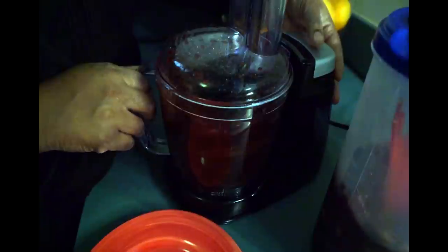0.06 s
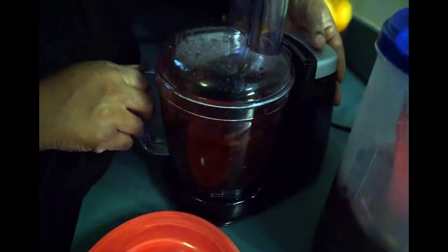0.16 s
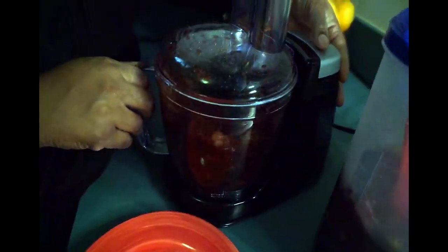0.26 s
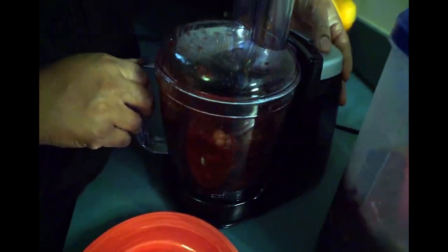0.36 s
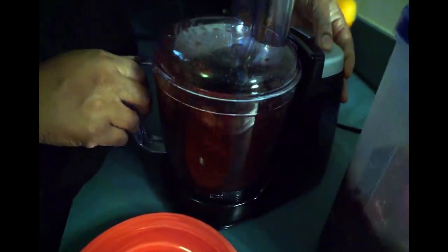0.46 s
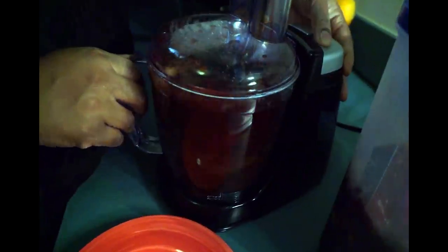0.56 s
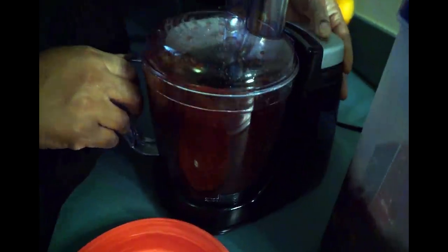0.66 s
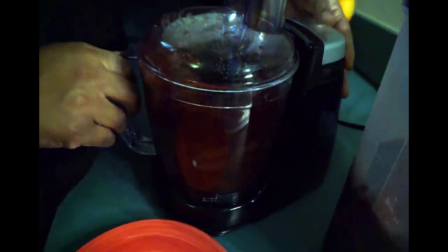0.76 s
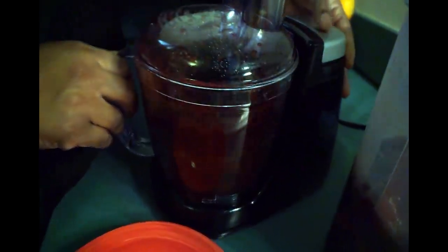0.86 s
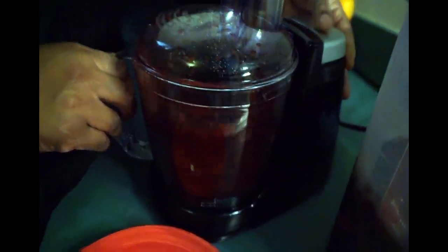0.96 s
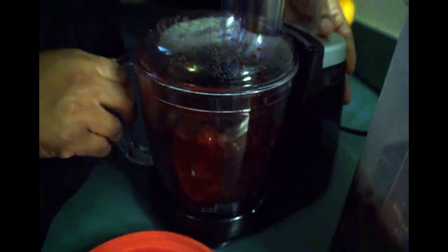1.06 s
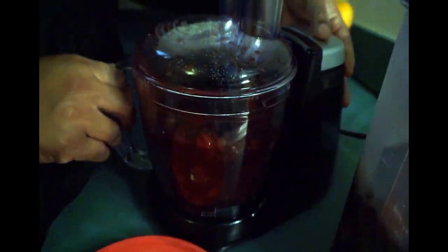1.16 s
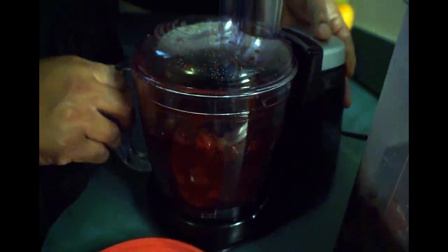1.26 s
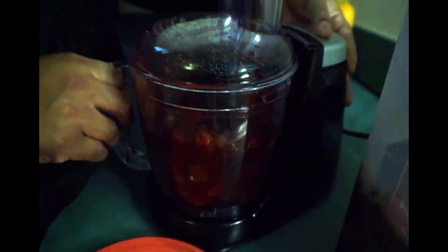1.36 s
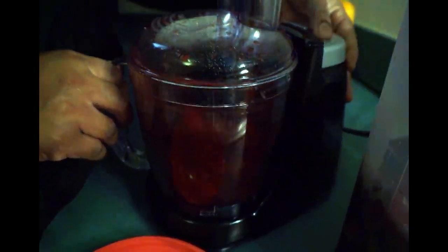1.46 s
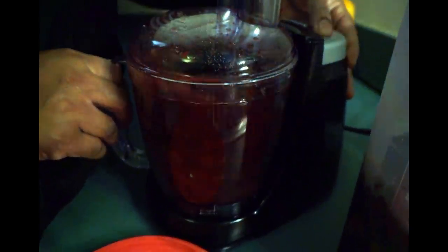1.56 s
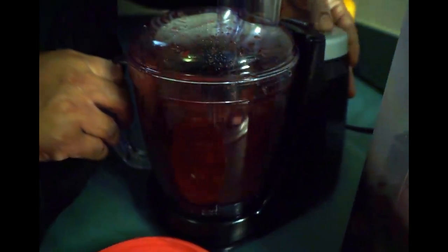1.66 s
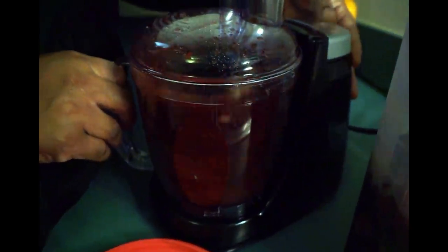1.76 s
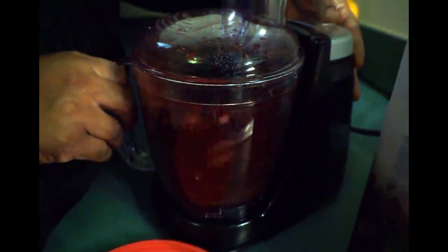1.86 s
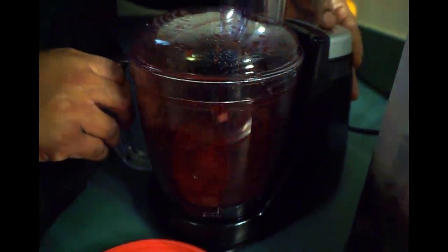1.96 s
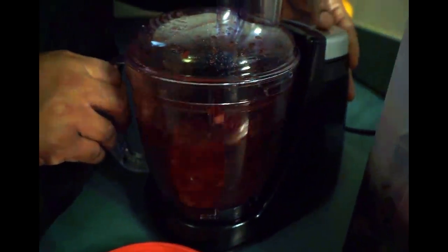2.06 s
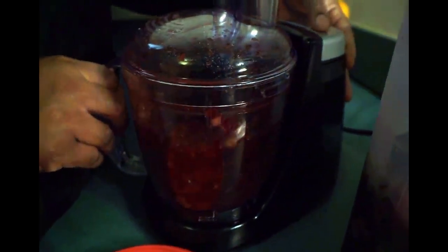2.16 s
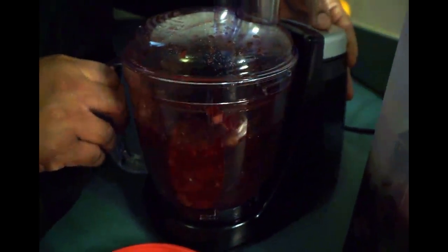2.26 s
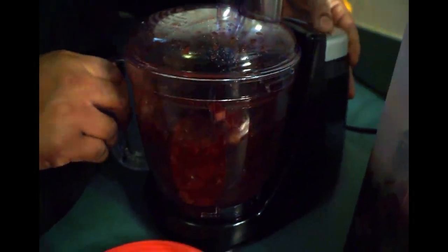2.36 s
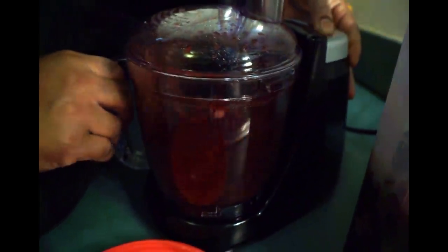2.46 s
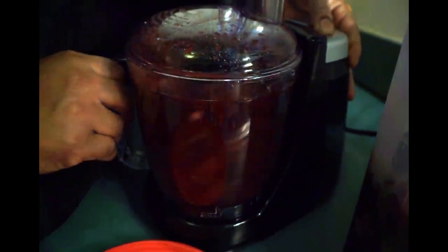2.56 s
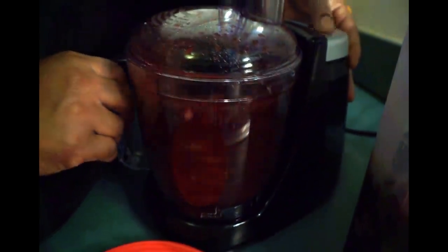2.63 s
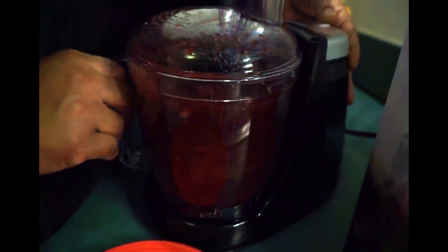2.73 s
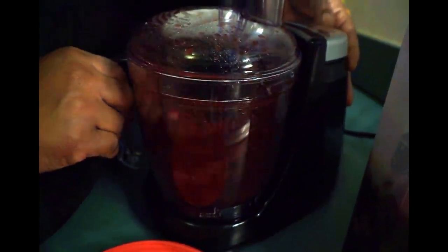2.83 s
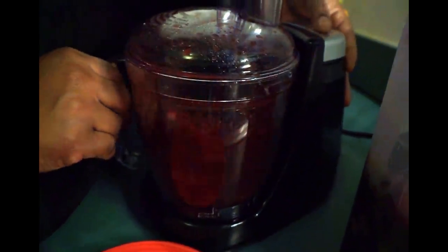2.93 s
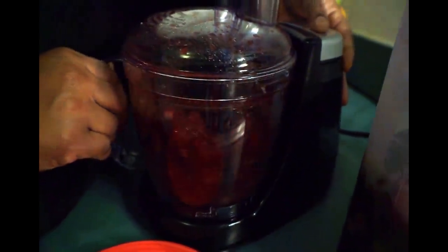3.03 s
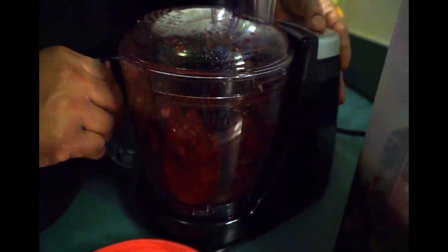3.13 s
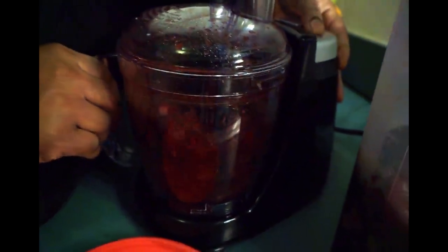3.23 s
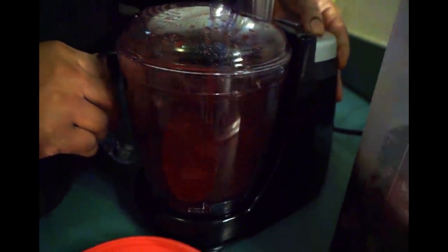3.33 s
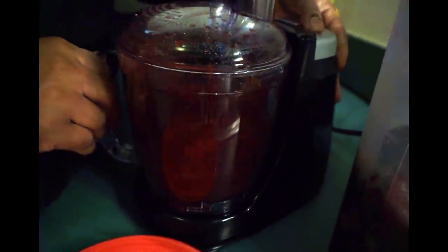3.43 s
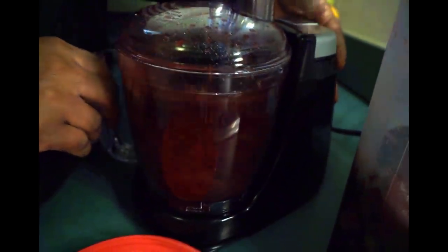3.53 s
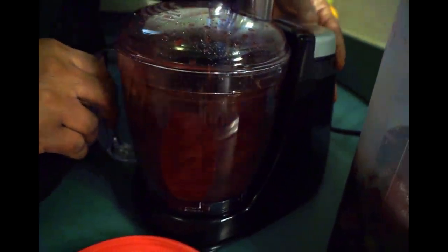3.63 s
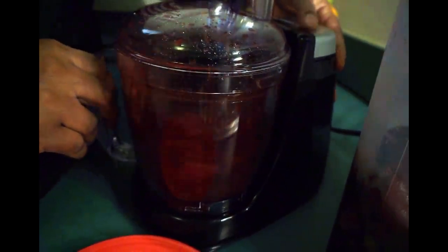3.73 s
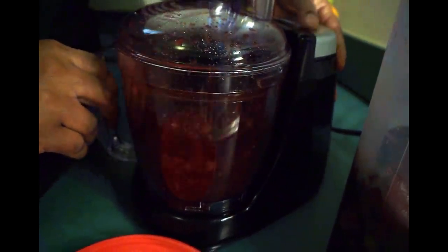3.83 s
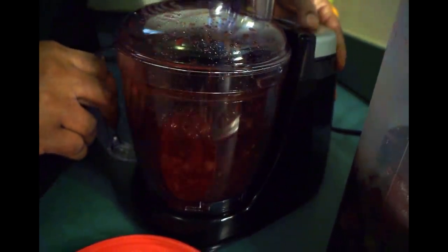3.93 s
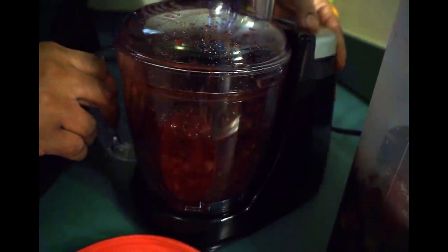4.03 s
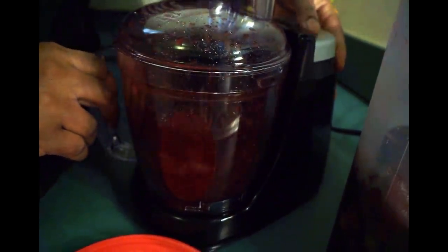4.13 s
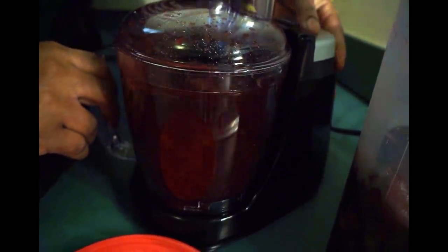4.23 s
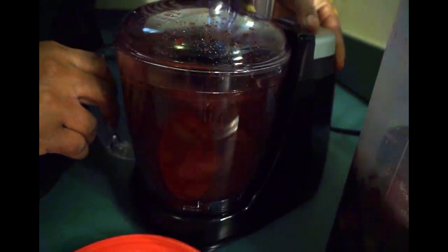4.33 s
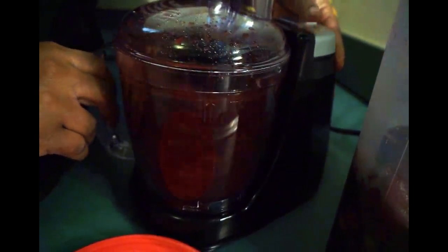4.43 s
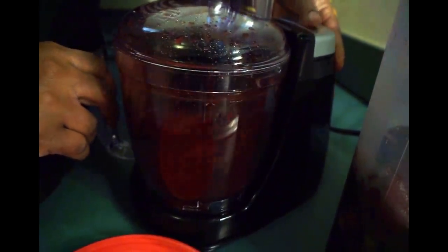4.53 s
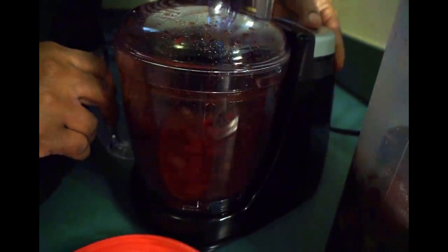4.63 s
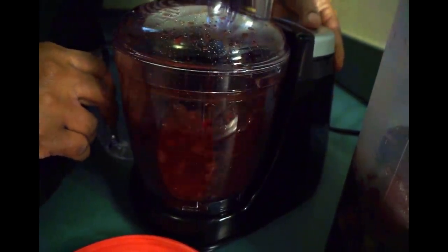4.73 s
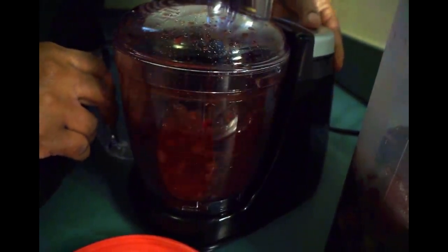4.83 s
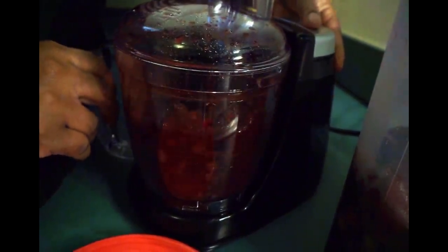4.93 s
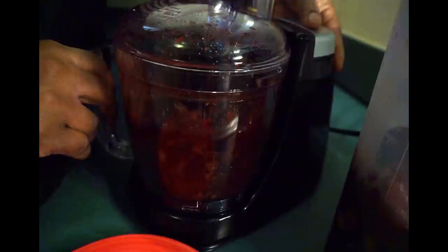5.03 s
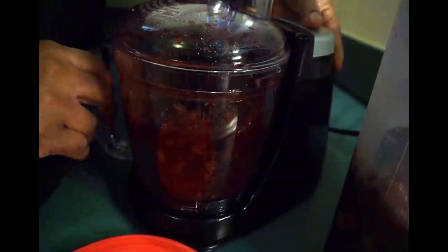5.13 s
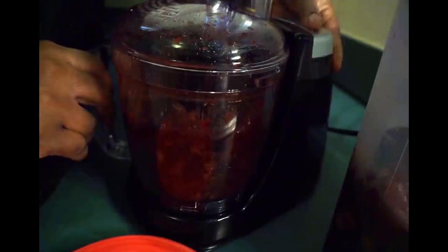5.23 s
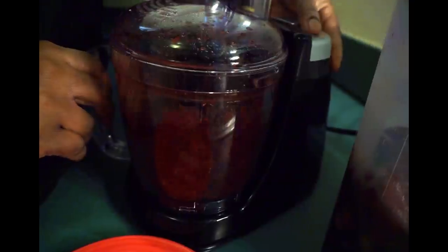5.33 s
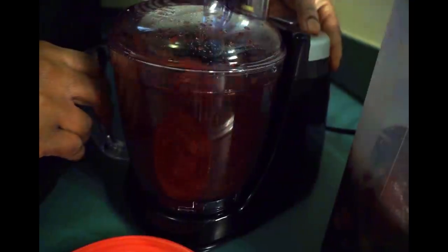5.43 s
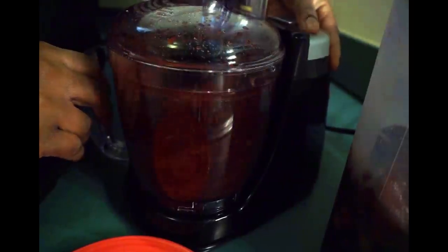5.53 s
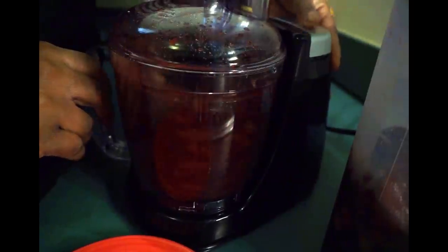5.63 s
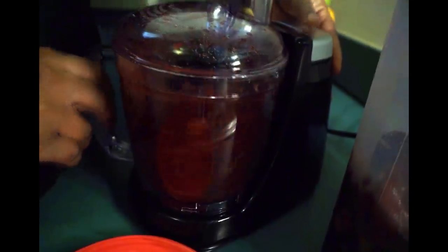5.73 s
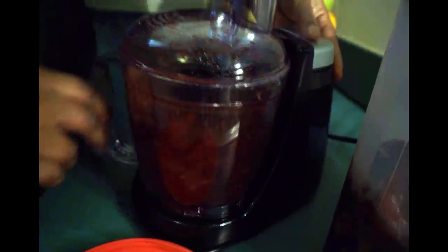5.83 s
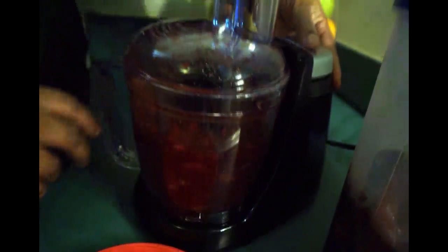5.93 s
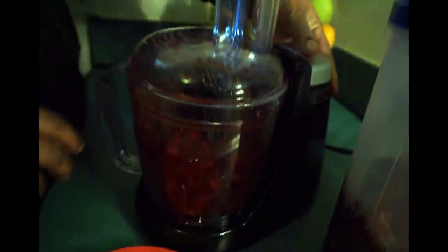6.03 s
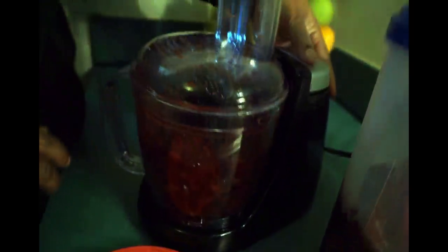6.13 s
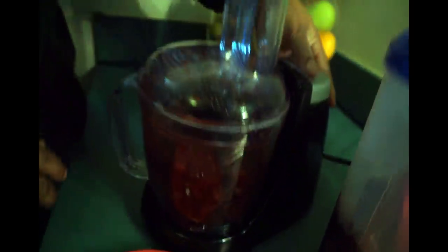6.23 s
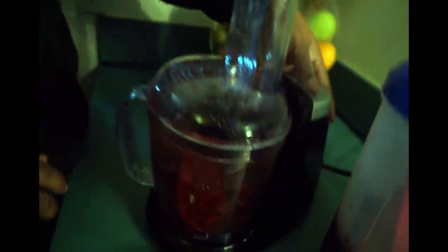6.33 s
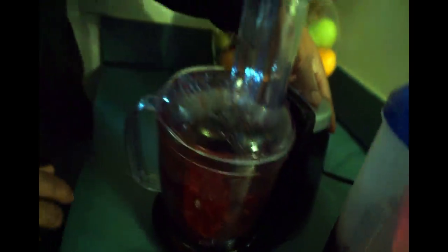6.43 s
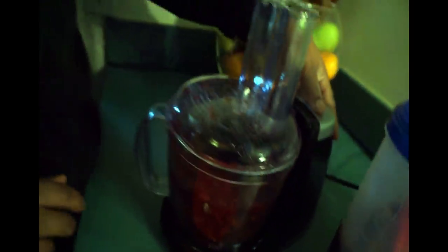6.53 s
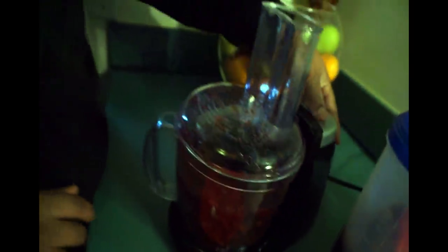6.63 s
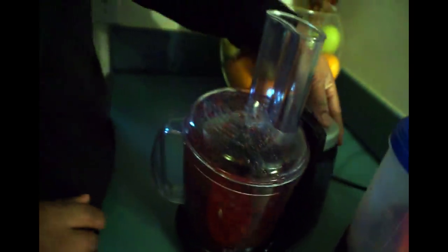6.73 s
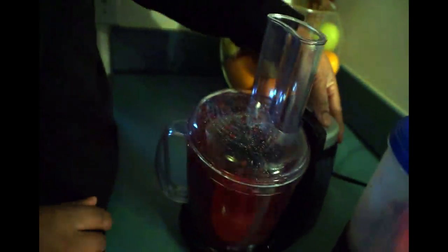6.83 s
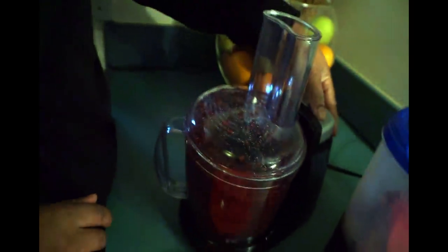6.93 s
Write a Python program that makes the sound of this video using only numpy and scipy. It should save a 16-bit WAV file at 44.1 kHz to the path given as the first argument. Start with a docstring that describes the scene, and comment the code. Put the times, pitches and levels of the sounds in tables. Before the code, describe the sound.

A small food processor chops fruit in short pulses, heard close up in a home kitchen. At the very start the motor is already winding down. New pulses come at about 0.5, 1.6, 2.5, 3.4, 4.2 and 5.4 seconds, each powered for roughly a quarter second, the last of these slightly longer. Each opens with a jolt of the housing, followed by rattling gears and a quickly rising whine that sinks as the blade coasts. Wet pulp churns, juice hisses and firm pieces knock against the plastic bowl. Between pulses the switch and lid creak and click, and froth fizzes faintly over a low household hum. The pulp gives a brief bubbling gloop near 5 seconds. After a lull with two soft clicks around 6.5 seconds, a final pulse starts at 6.8 seconds. The loudest peaks slightly overload the microphone.

```python
"""On a kitchen counter, a small food processor chops fruit in eight short pulses.
Each press jolts the housing. The gears rattle and whine at their tooth rate, which climbs under power
and sinks as the motor coasts, while the blade throws pulp and juice against the resonant plastic bowl.
Between pulses the switch creaks, froth fizzes and the pulp gloops over a low household hum.
The loudest moments overload the microphone."""
import sys
import numpy as np
from scipy import signal
from scipy.fft import rfft, irfft
from scipy.io import wavfile
from scipy.ndimage import uniform_filter1d, minimum_filter1d

SR = 44100
rng = np.random.default_rng(int(sys.argv[2]) if len(sys.argv) > 2 else 0)


def dump_mix(stems):
    """Bounce the given channels to the path in sys.argv[1] as a 16-bit WAV at rate SR."""
    frames = np.atleast_2d(stems).T  # one column per channel
    limited = np.clip(frames, -1, 1)  # hard clip at full scale
    pcm = np.round(limited * 32767).astype(np.int16)
    wavfile.write(sys.argv[1], SR, pcm)


N = 308259
TIME = np.arange(N) / SR
FREE_TOOTH_HZ, TEETH_PER_SWEEP = 4574, 36   # tooth rate at full speed; teeth per sweep of a blade
CRITICAL_HZ, CRITICAL_WIDTH_HZ = 3230, 210   # tooth rate at which the whole machine shakes

# presses of the switch: on_s, off_s, spin_up_s, coast_s, jolt_db, pulp_db, rattle_db, spray_db,
# driven_whine_db, coasting_whine_db, hoot_db, froth_db
PRESSES = [(-.28, -0.056, .1, .224, -10, -7.5, -18, -27, -23, -21, -40, -64),
           (.515, .736, 0.1, .234, -8, -8, -14.5, -30, -22, -24, -26.5, -63),
           (1.558, 1.786, .098, .24, -11, -7.5, -14.5, -29, -20.5, -23.5, -31.5, -61.5),
           (2.516, 2.734, 0.1, 0.24, -8, -6.5, -15, -24.5, -19.5, -21, -29, -60),
           (3.358, 3.571, .104, 0.23, -10.5, -7.5, -14.5, -28, -22, -23.5, -23.5, -64.5),
           (4.242, 4.441, .1, .238, -14, -8, -16, -29, -22.5, -23, -27, -54.5),
           (5.415, 5.698, 0.11, 0.25, -9.5, -8, -16, -27.5, -20.5, -23, -25, -47),
           (6.817, 7.049, 0.1, 0.27, -14.5, -7.5, -17.5, -36, -23, -23, -44, -57)]
# modes of the motor housing: pitch_hz, bandwidth_hz, gain_db
HOUSING_MODES = [(557, 50, -8.5), (807, 90, -4), (1107, 140, -2), (1262, 80, -1), (1520, 200, -3),
                 (2262, 510, -6), (3013, 250, 2.5), (3125, 110, -1), (3242, 130, 1), (4000, 400, -4),
                 (5050, 480, 1.5), (5770, 520, 5.5)]
# spectrum of the gear rattle: frequency_hz, density_db
RATTLE_SPECTRUM = [(30, -33), (90, -20.5), (200, 0), (950, 3), (1300, 4.5), (2000, 1), (2500, -0.5),
                   (3200, -0.5), (3800, -1.5), (4500, -10), (6000, -15.5), (9000, -19), (15500, -33.5)]
# spectrum of the wet spray: frequency_hz, density_db
SPRAY_SPECTRUM = [(100, -25), (2500, -7.5), (4400, 1), (5100, 5.5), (6000, 1.5), (7000, -2.5), (8500, -9.5),
                  (9800, -6), (12000, -13.5), (15000, -11)]


def from_db(db):
    """Decibels to amplitude ratio."""
    return 10 ** (np.asarray(db) / 20)


def unit_rms(x):
    """Normalisation to unit mean power."""
    return x / np.sqrt(np.mean(x ** 2) + 1e-20)


def evened(x, size=1800):
    """Division by the envelope holds the short-term rms at one."""
    local_power = np.abs(uniform_filter1d(x ** 2, size))
    return x / np.sqrt(local_power + 1e-6 * np.mean(x ** 2))


def near(hz, centre_hz, width_hz):
    """Gaussian bell of height one."""
    return np.exp(-.5 * ((hz - centre_hz) / width_hz) ** 2)


def dying(t60, age):
    """Exponential damping: 60 dB lost in t60 seconds."""
    return np.exp(-np.log(1000) * age / t60)


def drift(rate_hz):
    """Low-passed noise: a smooth random fluctuation of unit rms."""
    r = np.exp(-2 * np.pi * rate_hz / SR)
    return unit_rms(signal.lfilter([1], [1, -2 * r, r * r], rng.standard_normal(N + SR))[SR:])


def bandpass(x, low_hz, high_hz, order):
    """Maximally flat band-pass filter."""
    return signal.sosfilt(signal.butter(order, [low_hz, high_hz], "band", fs=SR, output="sos"), x)


def coloured(x, spectrum, size=4096):
    """Minimum-phase filter of unit energy with the given spectrum."""
    known_hz, known_db = np.transpose(spectrum)
    hz = np.maximum(np.arange(size // 2 + 1) * SR / size, 1)
    gain = from_db(np.interp(np.log(hz), np.log(known_hz), known_db))
    cepstrum = irfft(np.log(gain))
    response = irfft(np.exp(rfft(2 * cepstrum[:size // 2], size)))
    return signal.fftconvolve(x, response / np.linalg.norm(response))[:N]


def resonate(x, modes):
    """Modal superposition: damped resonators driven in parallel."""
    out = np.zeros(N)
    for hz, width_hz, db in modes:
        r = np.exp(-np.pi * width_hz / SR)
        feedback = [1, -2 * r * np.cos(2 * np.pi * hz / SR), r * r]
        out += from_db(db) * signal.lfilter([1 - r, 0, r - 1], feedback, x + 1e-18)
    return out


def add(out, start_s, sound):
    """Superpose a sound that starts within the scene."""
    start = round(start_s * SR)
    if 0 <= start < N:
        out[start:start + len(sound)] += sound[:N - start]


def bursts(starts_s, levels_db, t60):
    """Transient excitation: a damped burst of noise at each start."""
    envelope, age = np.zeros(N), TIME[:SR // 4]
    for start_s, db in zip(starts_s, levels_db):
        add(envelope, start_s, from_db(db) * dying(t60, age))
    return envelope * rng.standard_normal(N)


def impacts(hits, spread_db):
    """Shot noise: an impulse of random size and sign at each hit."""
    return hits * from_db(spread_db * np.minimum(rng.exponential(1, N), 4)) * rng.choice([-1, 1], N)


def room_tone():
    """Ambient noise: a low household rush and mains hum with wandering phase."""
    # partials of the hum: pitch_hz, rms_db
    hum_partials = [(118.4, -61.5), (236.9, -59), (312, -60)]
    # background of the kitchen: frequency_hz, density_db
    room_spectrum = [(25, -41), (45, -29.5), (80, -22.5), (110, -10.5), (160, -13), (230, -6.5),
                     (370, -2.5), (600, -8), (780, -11), (1000, -16.5), (1250, -16), (2000, -28.5),
                     (4500, -36), (8000, -47.5), (15000, -54)]
    hum = sum(from_db(db) * unit_rms(np.sin(2 * np.pi * hz * TIME + .78 * drift(1.7)))
              for hz, db in hum_partials)
    return hum + coloured(rng.standard_normal(N), room_spectrum) * from_db(-49.5 + 1.7 * drift(7.2))


def kitchen(x, t60=.31, wet_db=-9):
    """Reverberation: close walls and cupboards add a dense tail, duller than the direct sound."""
    age = TIME[:SR // 2]
    tail = rng.standard_normal(len(age)) * dying(t60, age) * (age > .003)
    tail = bandpass(tail / np.linalg.norm(tail), 400, 8000, order=1)
    return x + from_db(wet_db) * signal.fftconvolve(x, tail)[:N]


def bowl(x, low_hz=150, high_hz=1250):
    """Modal radiation: the small, pulp-damped bowl gives off neither bass nor treble."""
    # modes of the plastic bowl: pitch_hz, bandwidth_hz, gain_db
    bowl_modes = [(139, 49, -9), (226.8, 49, -9.5), (303.4, 15, 3), (364.3, 57, 0), (514, 44, 4.5),
                  (576.5, 54, 2), (645, 22, 11.5), (723.7, 77, 6.5), (758, 14, 1.5), (1128, 55, -2)]
    return bandpass(resonate(x, bowl_modes), low_hz, high_hz, order=2)


def froth(since_s):
    """Shot noise of popping bubbles: froth whipped up by each pulse fizzes as it settles."""
    # fizz of the froth: frequency_hz, density_db
    froth_spectrum = [(800, -7.5), (3000, -5), (4800, -1.5), (6500, -4), (10000, -9), (12500, -14.5),
                      (15500, -24)]
    pops = impacts(rng.random(N) < 1200 / SR, spread_db=1)
    fizz = unit_rms(coloured(pops, froth_spectrum)) * from_db(2 * drift(10))
    return fizz * dying(t60=2.1, age=since_s)


def gloops():
    """Bubble resonance: air rings in the pulp and rises a little in pitch as it nears the surface."""
    # rising bubbles: start_s, pitch_hz, level_db, t60_s
    bubbles = [(4.922, 432, -32, 0.19), (4.924, 620, -40.5, 0.06), (4.954, 540, -33, 0.058),
               (4.991, 744, -29, 0.068), (5.012, 806, -39, 0.15)]
    out, age = np.zeros(N), TIME[:SR // 4]
    for start_s, hz, db, t60 in bubbles:
        phase = 2 * np.pi * hz * age * (1 + .32 * age)
        add(out, start_s, from_db(db) * dying(t60, age) * np.sin(phase))
    return out


def ticks():
    """Contact noise of plastic parts: a dull creak of the body, a rattling edge and a sharp snap."""
    # contacts of switch, lid and handle: start_s, creak_db, edge_db, snap_db
    contacts = [(0.47, -31.5, -46, -57), (1.082, -28, -51, -47), (1.533, -29.5, -42.5, -54),
                (2.34, -40, -70, -71.5), (2.461, -30, -44.5, -58), (2.482, -31.5, -49, -65),
                (3.14, -42, -49.5, -54.5), (3.154, -50, -47, -49), (3.304, -26.5, -46, -64),
                (3.325, -33, -44.5, -56), (4.236, -17, -47, -51), (5.379, -32, -49, -63.5),
                (5.387, -30, -47, -63.5), (6.418, -39.5, -63, -71), (6.589, -34.5, -52, -66.5)]
    start_s, creak_db, edge_db, snap_db = np.transpose(contacts)
    creak = bowl(bursts(start_s, creak_db, t60=.13))
    edge = coloured(bursts(start_s, edge_db, t60=.08), RATTLE_SPECTRUM)
    snap = coloured(bursts(start_s, snap_db, t60=.044), SPRAY_SPECTRUM)
    return creak + edge + snap


def jolts(rise_s=.01):
    """Free vibration: the starting torque kicks the housing, whose modes ring down."""
    # housing modes rung by the kick: pitch_hz, level_db, t60_s
    jolt_modes = [(212.5, -8.5, 0.12), (301, 5.5, 0.14), (356, 3, 0.14), (496.7, 1.5, 0.12),
                  (697, 1.5, 0.082), (1106, -4, 0.094)]
    out, age = np.zeros(N), TIME[:SR // 4]
    for on_s, _, _, _, jolt_db, *_ in PRESSES:
        ring = np.zeros(len(age))
        for hz, db, t60 in jolt_modes:
            envelope = from_db(db + rng.normal(0, 1)) * dying(t60, age)
            ring += envelope * np.sin(2 * np.pi * (hz * age + rng.random()))
        add(out, on_s, from_db(jolt_db) * ring * (1 - np.exp(-age / rise_s)))
    return out


def chunks():
    """Impact excitation: firm pieces knock on the bowl, crack on the blade and ring the housing."""
    # pieces caught by the blade: start_s, knock_db, crack_db
    pieces = [(.553, 6, -12.5), (.65, 7, -22), (0.766, -9, -18.5), (.808, 4, -15), (1.64, 9, -16),
              (1.782, 5, -5), (2.551, -1, -17), (2.721, 2.5, -2), (2.763, 12, -26.5), (3.52, 5, -18.5),
              (4.28, 4.5, -0.5), (4.37, 3, -10), (5.56, 0, -16), (5.673, 7, -18.5), (5.71, 6, -17)]
    start_s, knock_db, crack_db = np.transpose(pieces)
    crack = bandpass(bursts(start_s, crack_db, t60=.05), 2500, 4100, order=4)
    knock = bowl(bursts(start_s, knock_db, t60=.054), low_hz=380)
    return knock + crack + from_db(-10.5) * resonate(crack, HOUSING_MODES)


def motor(on_s, off_s, spin_up_s, coast_s):
    """Rotor inertia: torque eases as the tooth rate climbs; after release, drag and friction brake."""
    friction_hz = 829   # tooth rate at which drag and dry friction brake equally
    powered_s = np.minimum(TIME, off_s) - on_s
    driven_hz = FREE_TOOTH_HZ * (1 - np.exp(-(powered_s / spin_up_s) ** .8))
    run_down = np.exp(-np.maximum(TIME - off_s, 0) / coast_s)
    tooth_hz = np.maximum((driven_hz + friction_hz) * run_down - friction_hz, 0)
    torque = (1 - tooth_hz / FREE_TOOTH_HZ) * (TIME < off_s)
    return tooth_hz, torque


def effort(running, exponent, torque_share, swell_db, attack_s):
    """Power law: noise grows with speed, plus a share of torque, and swells at the critical speed."""
    tooth_hz, torque, since_s = running
    drive = (tooth_hz / FREE_TOOTH_HZ) ** exponent + torque_share * torque
    swell = from_db(swell_db * near(tooth_hz, CRITICAL_HZ, CRITICAL_WIDTH_HZ))
    return drive * swell * (1 - np.exp(-since_s / attack_s))   # sets in as the slack is taken up


def blade_sweep(teeth):
    """Blade-passing modulation: one cosine cycle for each sweep."""
    return np.cos(2 * np.pi * teeth / TEETH_PER_SWEEP)


def spray(running, teeth):
    """Comb filtering: juice hisses and spatters on the wall, and short echoes colour the sound."""
    # reflections inside the bowl: delay_s, amplitude_ratio
    bowl_echoes = [(.0011, 0.21), (.0023, -.3), (.0037, .3)]
    splashes = from_db(1.1 * blade_sweep(teeth) + 1.7 * drift(120))
    drops = unit_rms(impacts(rng.random(N) < 2500 / SR, spread_db=2.5))
    hiss = coloured((rng.standard_normal(N) + from_db(-5) * drops) * splashes, SPRAY_SPECTRUM)
    echoes = sum(ratio * np.roll(hiss, round(delay_s * SR)) for delay_s, ratio in bowl_echoes)
    gain = effort(running, exponent=1.33, torque_share=.078, swell_db=3.4, attack_s=.003)
    return gain * evened(hiss + echoes)


def slosh(running):
    """Soft impact: the mass of the pulp slaps around the bowl and rings only its low modes."""
    slaps = evened(impacts(rng.random(N) < 500 / SR, spread_db=2.5))
    gain = effort(running, exponent=1, torque_share=.99, swell_db=.5, attack_s=.0086)
    return gain * evened(bowl(slaps, low_hz=152, high_hz=410))


def churn(running, tooth_hz, teeth, tone):
    """Random impact excitation: every sweep of the blade flings pieces against the bowl."""
    hits_per_s = (250 + .5 * tooth_hz) * from_db(4 * blade_sweep(teeth))
    hits = evened(impacts(rng.random(N) < hits_per_s / SR, spread_db=2.5))
    spindle = from_db(-15) * tone   # gear tone conducted into the bowl
    gain = effort(running, exponent=1.89, torque_share=.3, swell_db=1.8, attack_s=.0023)
    return gain * evened(bowl(hits + spindle, low_hz=400, high_hz=1100))


def rattle(running, teeth):
    """Tooth impact noise: the gears clack with uneven force over the rush of the motor."""
    tooth_hits = np.diff(np.floor(teeth), prepend=0)
    stray_hits = rng.random(N) < 150 / SR
    clacks = evened(impacts(tooth_hits + stray_hits, spread_db=3))
    rush = .83 * rng.standard_normal(N)
    clatter = coloured(clacks + rush, RATTLE_SPECTRUM) * from_db(1.9 * drift(70))
    gain = effort(running, exponent=1.28, torque_share=.32, swell_db=.68, attack_s=.0037)
    return gain * evened(clatter)


def gear_tone(tooth_hz, teeth):
    """Gear meshing: the tooth rate and its octave, which backlash makes stagger."""
    slack = 1 - tooth_hz / FREE_TOOTH_HZ
    slip = .058 * drift(330) + (.01 + .075 * slack ** 2) * drift(80)
    phase = 2 * np.pi * (teeth + np.cumsum(tooth_hz * slip) / SR)
    flutter = from_db((2.6 + .6 * slack) * drift(120))
    partials = np.sin(phase) + from_db(-16.5) * np.sin(2 * phase)
    strain = from_db(3 * slack * blade_sweep(teeth))   # slow gears strain at each sweep
    fade_at_rest = np.tanh((tooth_hz / 520) ** 2) ** 2
    return evened(partials * flutter, size=6000) * strain * fade_at_rest


def hoot(tooth_hz, tone):
    """Swept resonance: shortly before the blade stands, the gear tone sinks through the bowl's modes."""
    return bowl(tone * near(tooth_hz, centre_hz=600, width_hz=92))


def whine(tooth_hz, tone, off_s, driven_db, coasting_db):
    """Forced vibration: the housing radiates the gear tone, which flares at each mode it crosses."""
    coasting = np.clip((TIME - off_s) / .12, 0, 1)
    level_db = driven_db + (coasting_db - driven_db) * coasting
    swell_db = 2.5 * near(tooth_hz, CRITICAL_HZ, CRITICAL_WIDTH_HZ)
    return from_db(level_db + swell_db) * resonate(tone, HOUSING_MODES)


def scene():
    """Superposition: one motor drives pulp, juice and gears, heard directly and by way of the walls."""
    presses = np.array(PRESSES)
    latest = np.searchsorted(presses[:, 0], TIME, side="right") - 1   # press in force at each sample
    (on_s, off_s, spin_up_s, coast_s, _, pulp_db, rattle_db, spray_db,
     driven_db, coasting_db, hoot_db, froth_db) = presses[latest].T
    since_s = TIME - on_s
    tooth_hz, torque = motor(on_s, off_s, spin_up_s, coast_s)
    running = tooth_hz, torque, since_s
    teeth = np.cumsum(tooth_hz) / SR   # count of teeth passed
    tone = gear_tone(tooth_hz, teeth)
    pulp = churn(running, tooth_hz, teeth, tone) + from_db(-10.5) * slosh(running)
    pulp *= from_db(pulp_db + 2.3 * drift(18))   # lumps reach the blade unevenly
    juice = from_db(spray_db) * spray(running, teeth) + from_db(froth_db) * froth(since_s)
    gears = from_db(rattle_db) * rattle(running, teeth) + from_db(hoot_db) * hoot(tooth_hz, tone)
    gear_whine = kitchen(whine(tooth_hz, tone, off_s, driven_db, coasting_db), t60=.25, wet_db=-4)
    chopping = kitchen(pulp + juice + gears + jolts() + chunks() + ticks() + gloops())
    return (chopping + gear_whine + room_tone())[None]


def record(dry, limit=.8, ceiling=.91, cutoff_hz=15300):
    """Overload: a fast limiter holds the peaks, saturation rounds them and a low-pass cuts the top."""
    allowed_gain = np.minimum(1, limit / (np.abs(dry) + 1e-9))
    held = dry * uniform_filter1d(minimum_filter1d(allowed_gain, size=61), size=61)
    rounded = held / (1 + (held / ceiling) ** 8) ** (1 / 8)
    return signal.sosfilt(signal.ellip(10, .1, 80, cutoff_hz, fs=SR, output="sos"), rounded)


dry = scene()
out = record(dry)
dump_mix(out)
```